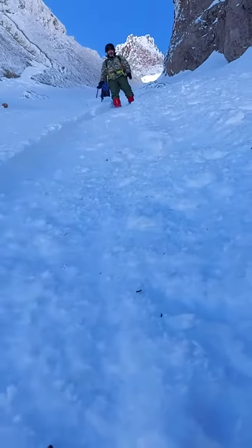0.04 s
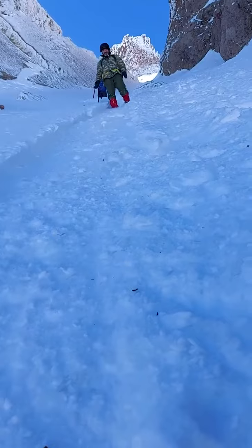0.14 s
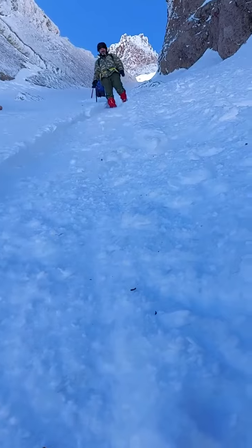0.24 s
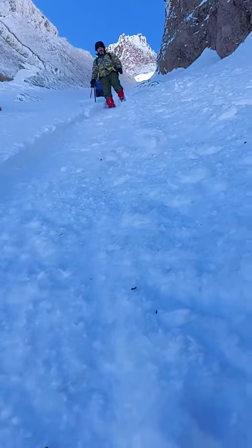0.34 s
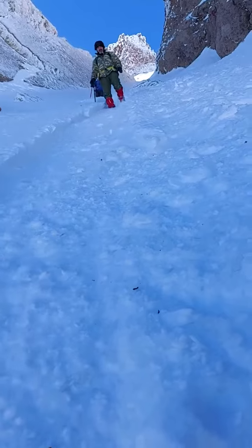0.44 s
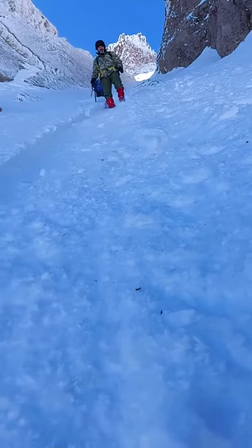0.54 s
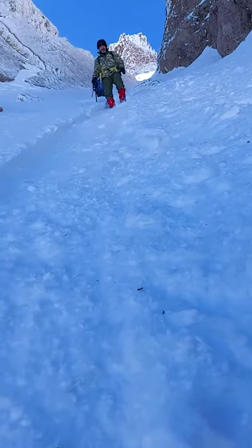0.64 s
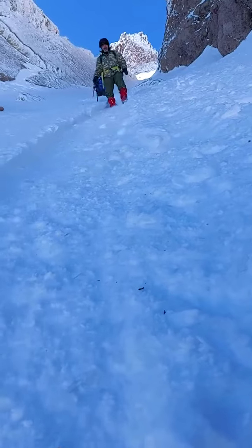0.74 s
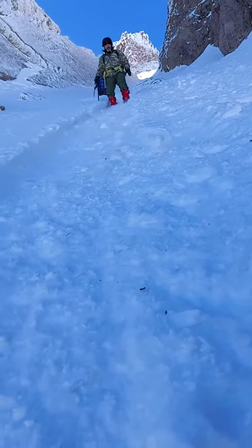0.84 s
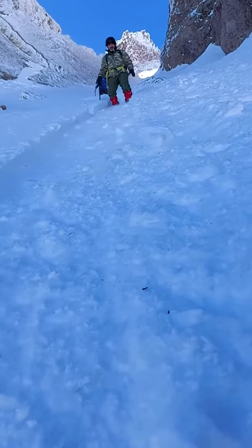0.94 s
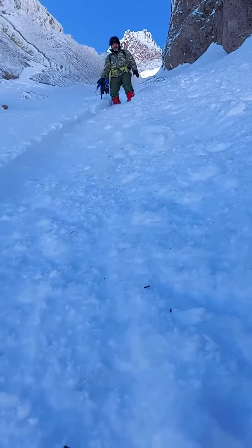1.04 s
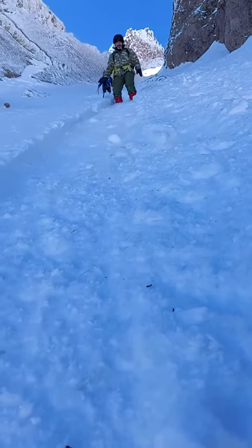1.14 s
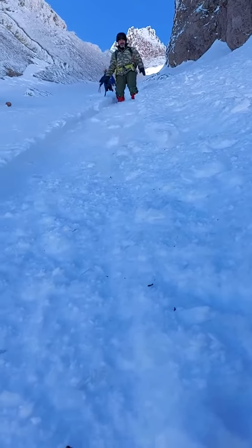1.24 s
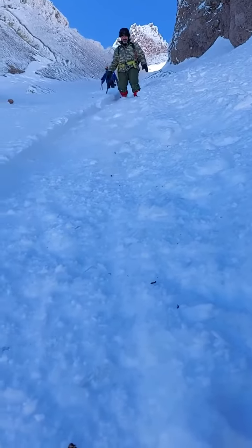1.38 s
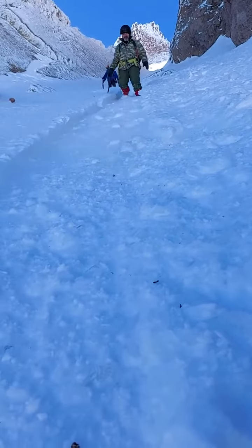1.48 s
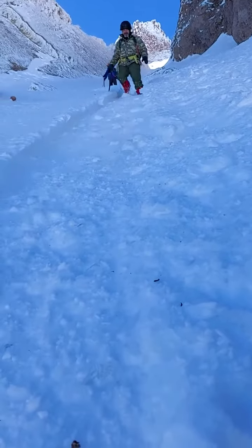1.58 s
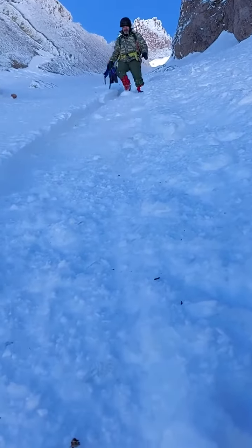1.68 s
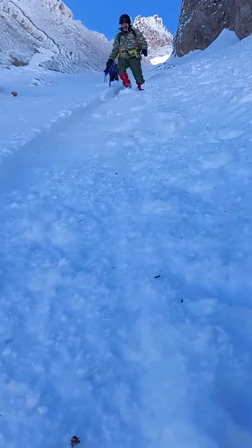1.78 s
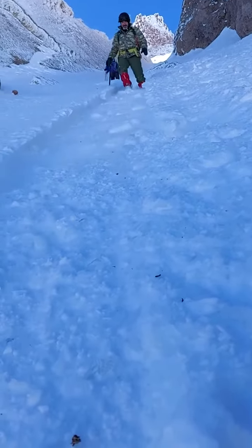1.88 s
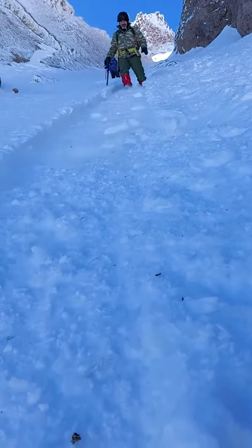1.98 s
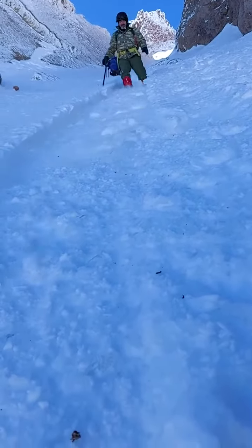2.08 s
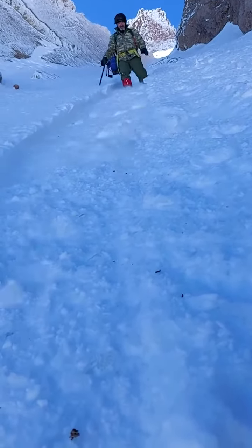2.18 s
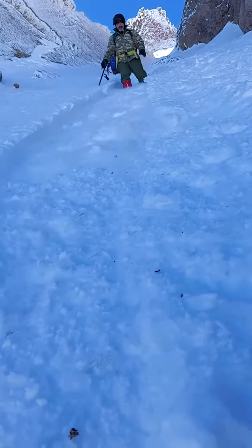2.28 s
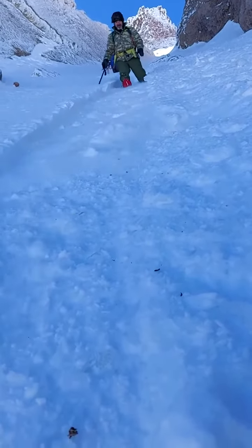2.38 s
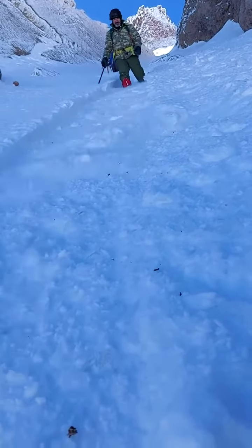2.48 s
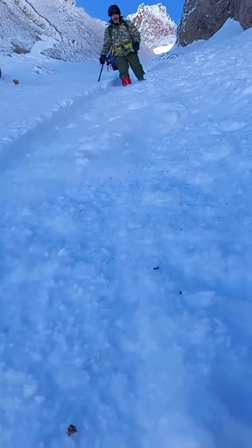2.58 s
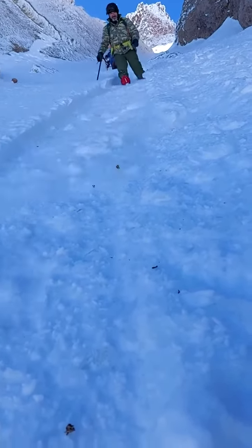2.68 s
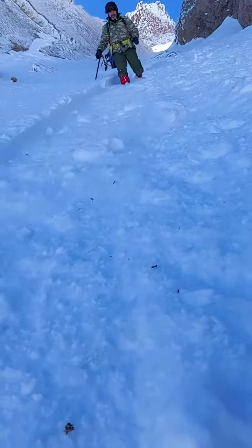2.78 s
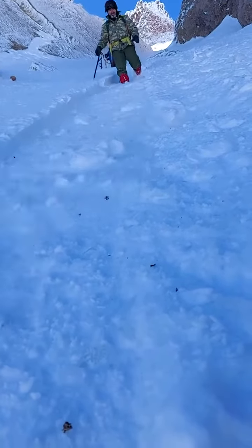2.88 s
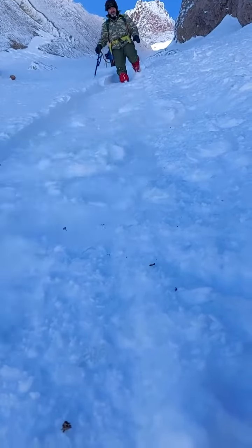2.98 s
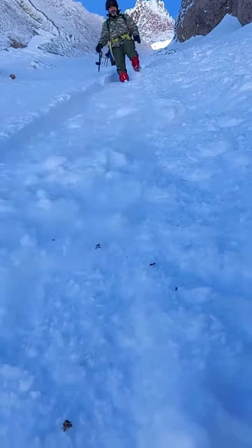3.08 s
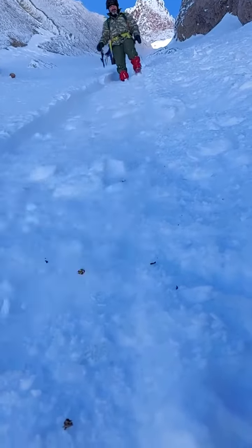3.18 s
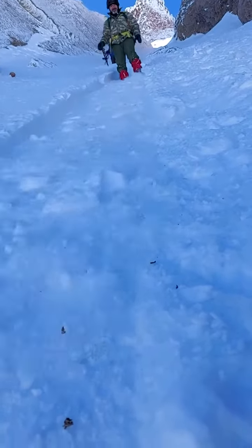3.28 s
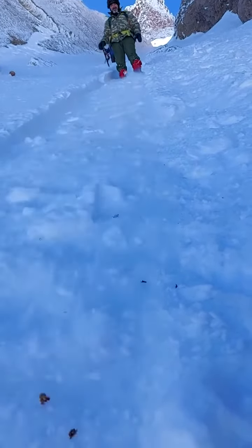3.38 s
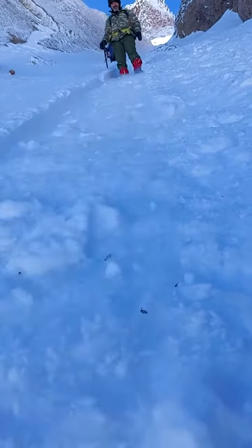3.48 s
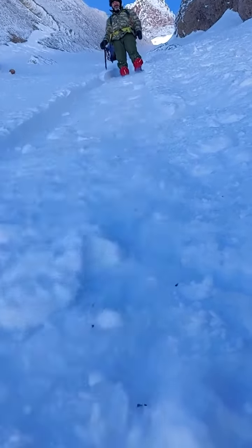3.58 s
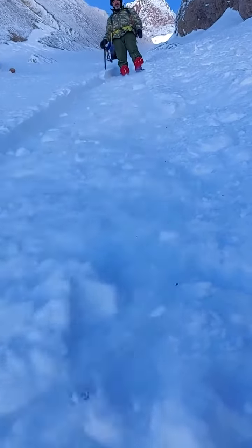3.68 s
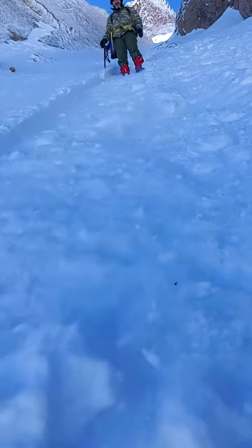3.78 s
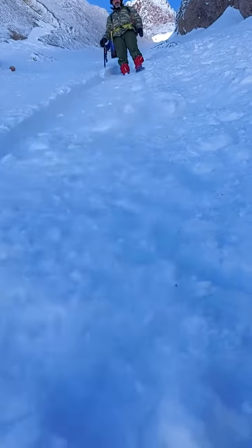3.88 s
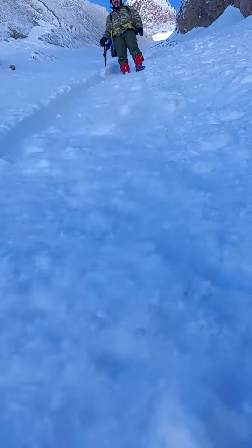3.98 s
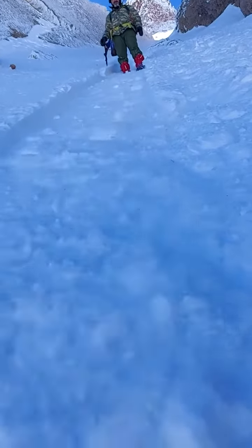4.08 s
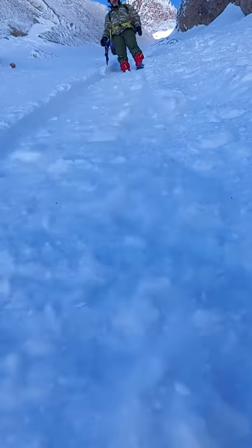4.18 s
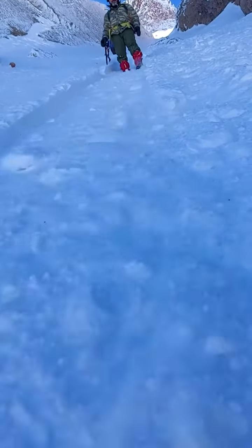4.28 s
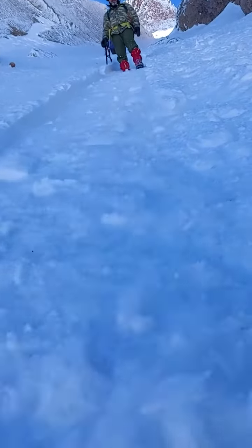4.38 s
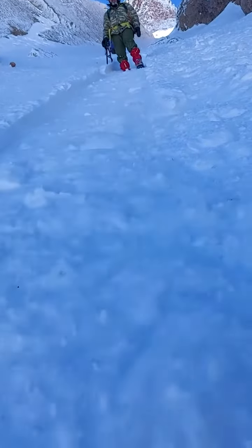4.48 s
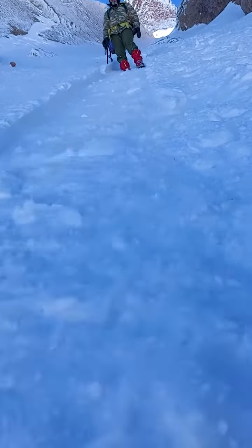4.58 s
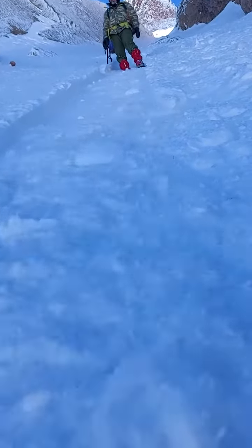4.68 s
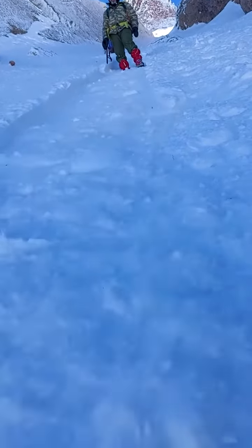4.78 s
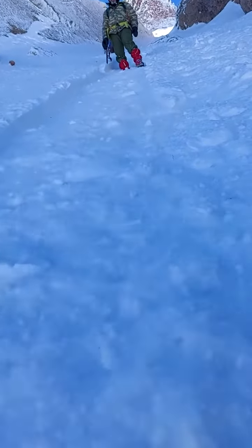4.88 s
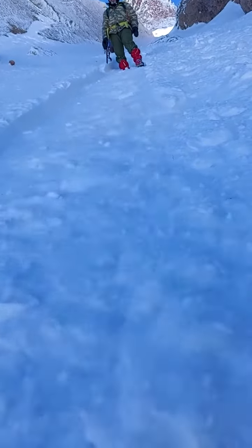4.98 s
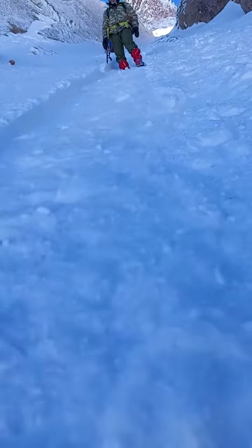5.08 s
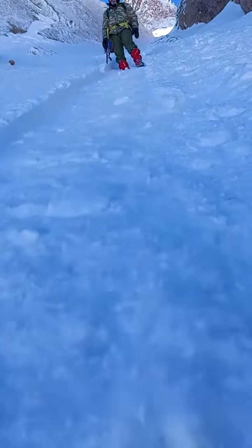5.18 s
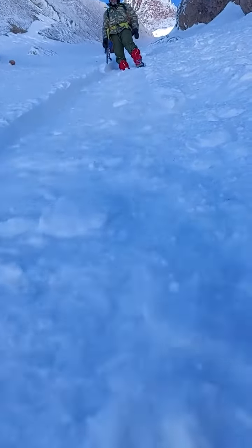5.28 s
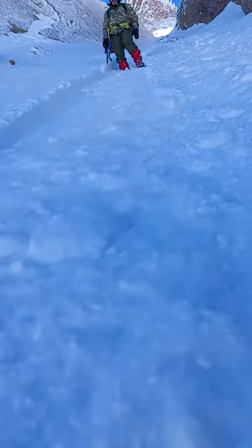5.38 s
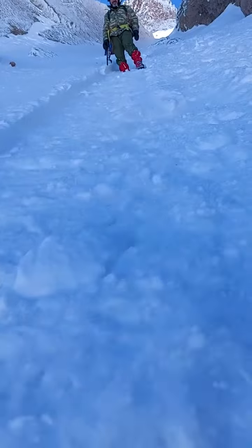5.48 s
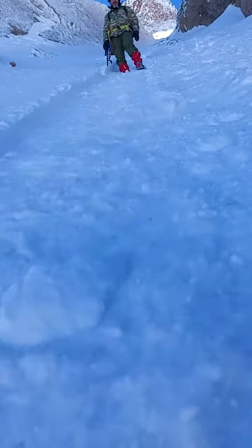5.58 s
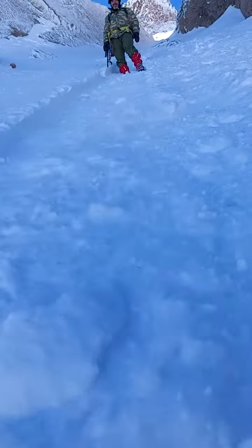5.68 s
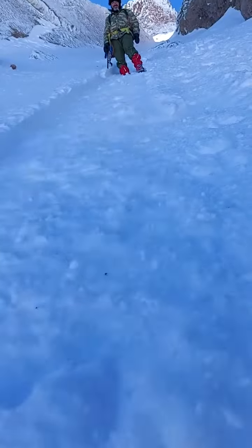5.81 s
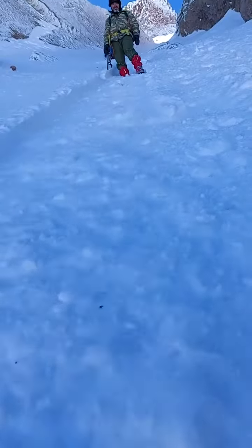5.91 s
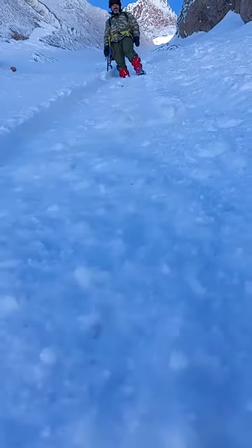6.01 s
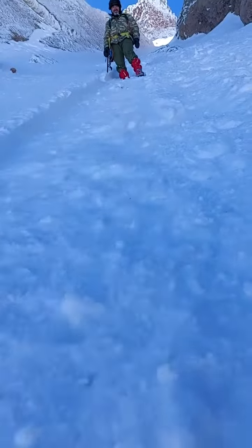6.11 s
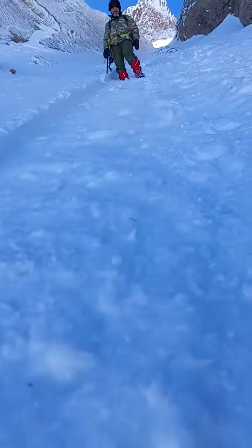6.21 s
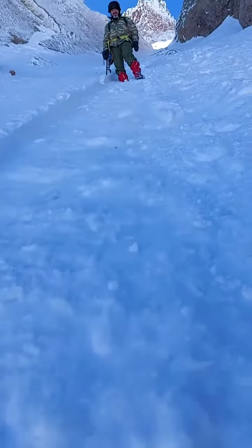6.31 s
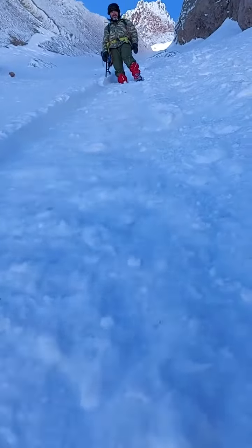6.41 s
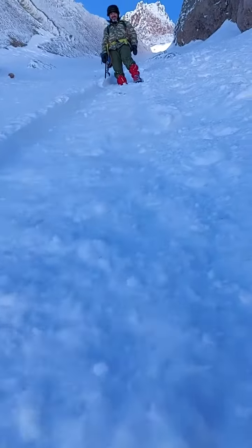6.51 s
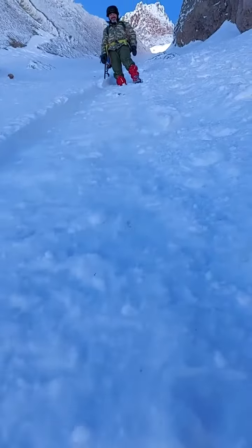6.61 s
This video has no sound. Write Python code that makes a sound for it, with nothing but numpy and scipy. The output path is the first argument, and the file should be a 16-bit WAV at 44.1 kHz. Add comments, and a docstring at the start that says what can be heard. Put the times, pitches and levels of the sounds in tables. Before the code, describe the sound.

Loose snow trickles down a steep mountain gully with a thin, high hiss on the right, while light wind buffets the microphone and something clinks faintly like metal gear. About three seconds in, the hiss swells into a broad, grainy slide over a duller rush of tumbling clods. It pours past on the right and eases slightly, with small hard clicks and soft lumps tapping close by.

```python
"""Loose snow slides down a steep gully past two spaced microphones.
First a thin trickle of crystals hisses on the right, with clinks like jingling metal gear, while light
wind buffets each microphone on its own. Then the front of the slide crosses from the left, and after
three seconds the trickle grows into a broad hiss over a duller rush of tumbling clods. To the end,
the mass pours by on the right, with small hard clicks, ringing clinks and soft lumps tapping near by."""
import sys
import numpy as np
from scipy import signal
from scipy.io import wavfile

SR = 44100
rng = np.random.default_rng(int(sys.argv[2]) if len(sys.argv) > 2 else 0)


def int16_out(signal):
    """Quantize to a 16-bit WAV file."""
    q = np.round(np.clip(np.atleast_2d(signal).T, -1, 1) * 32767)
    wavfile.write(sys.argv[1], SR, q.astype(np.int16))


N = 293265

# tone colour of rubbing crystals: f/Hz, level/dB
CRYSTAL_SPECTRUM = [(900, -15), (1600, -6.5), (2100, -5.5), (2750, -2), (3400, 0), (4200, -2), (5000, 4.5),
                    (5900, -2.5), (7000, -0.5), (8000, -4.5), (8750, -7), (9700, -3), (10500, -3.5),
                    (12500, -5), (15500, -5)]
CLUMP_DB, CLUMPS_PER_S = 3, 18  # larger impacts come in bunches
SIDE_LAG = 23  # samples by which a sound on the far right reaches the left microphone late
PAN = np.array([[.5], [-.5]])  # splits a left-minus-right level between the two sides


def crystal_hiss(level_db, treble_db, low_db, front):
    """Crystals rub and shatter all over the slope, so the two sides hear little in common."""
    # how alike the two sides sound: f/Hz, likeness (0 to 1)
    likeness = [(900, .7), (1800, .45), (3000, .25), (5000, .15), (8000, .25), (15000, .12)]
    trickle_db, full_db = -43.5, -41  # between these levels the trickle turns into the full slide
    fullness = np.clip((level_db - trickle_db) / (full_db - trickle_db), 0, 1)
    grains = impacts(per_s=450, spread_db=3, share=0.047)
    pair = flickering_bands(grains, CRYSTAL_SPECTRUM, likeness, shared_db=0.12, own_db=1.23,
                            own_rate=17.6, top_db=treble_db, bottom_db=low_db, front=front)
    sparkle = singing(fullness) + from_db(-10) * crystal_glints() + grain_ticks()
    pair = pair + delay_left(sparkle, SIDE_LAG * front[0])
    return from_db(level_db) * pair * from_db(-0.8 * PAN)


def singing(fullness, alike=0.15, waver_db=6.5):
    """Noise rings at a few pitches that swell and sink; the slide favours other ones than the trickle."""
    # pitches in the hiss: f/Hz, rough width/Hz, level in the trickle/dB, level in the full slide/dB
    pitches = [(1894, 240, -17.5, -20), (3300, 150, -15, -27.5), (3530, 460, -40, -13),
               (4470, 76, -15.5, -28), (4970, 210, -13.5, -14.5), (6210, 84, -15.5, -37),
               (6800, 230, -15, -14), (7200, 370, -9.5, -14)]
    out, white = 0, rng.standard_normal((2, 2, N))
    for k, (hz, width, thin_db, full_db) in enumerate(pitches):
        ring_s = 0.95 / width
        mid, side = ring(ring(white[k % 2], hz, ring_s), hz, ring_s)
        level_db = thin_db + (full_db - thin_db) * fullness + waver_db * np.tanh(drift(14))
        out = out + rms_one(stereo(mid, side, alike)) * from_db(level_db)
    return out


def crystal_glints(per_s=700, cycles=140):
    """Small crystals, scratched at random, ring briefly, each at its own pitch and place."""
    sizes = from_db(1.1 * np.minimum(rng.exponential(1, N), 4)) * bunched_hits(per_s, N)
    pitch_index = rng.integers(0, 36, N)
    pan = from_db(np.clip(rng.normal(0, 6.1, N), -12, 12) * PAN)
    out, grit = 0, rng.standard_normal(N)
    for k, hz in enumerate(np.geomspace(1200, 15000, 36)):
        fading_hits = signal.lfilter([1], [1, -.93], sizes * (pitch_index == k) * pan + 1e-18)
        scratch = fading_hits * np.roll(grit, 997 * k)
        out = out + ring(scratch, hz, cycles / hz) * from_db(at_hz(CRYSTAL_SPECTRUM, hz)) * hz ** 1.47
    return rms_one(out)


def grain_ticks(per_s=70, base_db=9, spread_db=1.5):
    """Single hard grains strike near by: needle-thin ticks that both microphones hear."""
    sizes = from_db(base_db + spread_db * np.minimum(rng.exponential(1, N), 4)) * rng.choice([-1, 1], N)
    pan = from_db(np.clip(rng.normal(0, 4, N), -10, 10) * PAN)
    hits = rng.random(N) < per_s / SR
    return filtered(sizes * pan * hits + 1e-18, 1, [1500, 11000], "band")


def clod_rush(level_db, front):
    """Clods tumble in the moving mass and make a dull rush."""
    # tone colour of the clods: f/Hz, level/dB
    spectrum = [(75, -25), (120, -16), (200, -16), (400, -10.5), (700, -9.5), (1200, -15), (2000, -26),
                (3500, -24.5)]
    # how alike the two sides sound: f/Hz, likeness (0 to 1)
    likeness = [(80, .85), (300, .9), (700, .8), (1200, .65), (2000, .4), (3500, .2)]
    clods = impacts(per_s=150, spread_db=1.5, share=0.18)
    pair = flickering_bands(clods, spectrum, likeness, shared_db=0.3, own_db=1.5, own_rate=12.3,
                            front=front)
    return from_db(level_db) * pair * from_db(-2.6 * PAN)


def level_dips():
    """The slide's level dips briefly and smoothly; the result is in dB."""
    # dips: t/s, length/s, depth/dB
    dips = [(0.566, 0.13, 3.5), (2.035, 0.071, 3.5), (3.071, 0.016, 8)]
    t = np.arange(N) / SR
    return sum(-db * np.cos(np.pi * np.clip((t - s) / length, -.5, .5)) ** 2 for s, length, db in dips)


def ringing_clicks(size=1500):
    """Small hard clicks: a crack of a millisecond or two, then a brief ring at one pitch."""
    # clicks: t/s, level/dB, f/Hz, cycles to fade by 60 dB
    clicks = [(0.017, -28.5, 4360, 32), (.629, -29, 4480, 50), (.642, -33, 4450, 70), (.668, -35, 4600, 60),
              (.800, -39, 6150, 80), (.817, -39, 6200, 70), (.819, -34, 2800, 5), (.839, -28, 6210, 60.0),
              (.842, -33, 6160, 60), (.850, -39, 6200, 80), (1.15, -40, 4400, 60), (1.236, -42, 4430, 60),
              (1.605, -33, 4300, 34), (2.063, -42, 4430, 40), (1.526, -27, 8200, 43),
              (1.664, -35, 3300, 24), (1.782, -31, 7260, 47), (2.17, -33, 8140, 35.0),
              (2.586, -33, 6600, 40), (2.5917, -22, 6300, 66), (2.5948, -18.5, 6470, 60),
              (2.617, -28, 6430, 60.0), (2.91, -24, 7260, 8), (2.911, -32, 2600, 4),
              (2.952, -26, 9300, 80.0), (3.054, -20, 6500, 15), (3.0565, -15.5, 7330, 35),
              (3.097, -35, 3560, 11), (3.0572, -30, 4900, 30.0), (3.291, -24, 4950, 17),
              (3.596, -29, 3600, 20), (3.623, -28, 3720, 30), (3.632, -22, 3600, 37),
              (3.725, -26, 12600, 40.0), (3.84, -15, 7300, 23), (3.928, -18, 8950, 1.5),
              (3.963, -16.5, 3370, 17), (3.995, -18.5, 3440, 12), (4.027, -17.5, 5300, 32),
              (4.128, -21, 3500, 3), (4.680, -23, 11500, 4), (4.694, -18.5, 11400, 9),
              (4.698, -21, 12000, 8), (4.700, -25, 11000, 8), (4.838, -24, 12500, 4), (4.876, -24, 3560, 4),
              (4.899, -19, 5000, 3.5), (5.018, -25, 7000, 40), (5.081, -29, 7000, 25),
              (5.213, -27, 5300, 30), (5.274, -25, 5070, 55.0), (5.326, -21.5, 7200, 35),
              (5.536, -24, 10600, 10), (5.581, -29, 6900, 30), (5.540, -25, 12500, 8),
              (5.598, -23, 11800, 10), (5.602, -27, 12800, 9), (5.865, -28, 7760, 25),
              (5.875, -24, 6900, 45.0), (5.889, -25, 7600, 30), (5.921, -25, 6900, 35),
              (5.961, -28, 8000, 15), (6.078, -27, 6900, 25), (6.392, -20.5, 6800, 60.0),
              (6.595, -32, 5600, 20.0), (6.629, -24, 6200, 39)]
    out, t = np.zeros((2, N + size)), np.arange(size) / SR
    for (s, db, hz, cycles), noise in zip(clicks, rng.standard_normal((len(clicks), 3, size))):
        burst = (noise[0] + 0.79 * noise[1:]) * np.exp(-t / 0.0014) * (1 - np.exp(-t / 0.0001))
        tone = peak_one(ring(burst, hz, max(cycles, 5) / hz))
        crack = peak_one(ring(burst, hz, 0.52 / hz))
        crack_db = -11 - 0.1678 * cycles  # the clearer the ring, the weaker the crack
        out[:, round(s * SR):][:, :size] += from_db(db) * (tone + from_db(crack_db) * crack)
    return filtered(out[:, :N], 2, 1800, "high") * from_db(-2.4 * PAN)


def clinks(bounces_per_s=250):
    """Quick uneven bounces keep one pitch ringing; the early clinks are like jingling metal gear."""
    # clinks: t/s, length/s, f/Hz, level/dB
    events = [(0.094, 0.11, 7270, -43.5), (0.47, 0.042, 7400, -45), (0.606, 0.075, 4530, -49),
              (0.792, 0.076, 6100, -47.5), (1.544, 0.05, 8650, -47.5), (2.412, 0.056, 6410, -46),
              (2.573, 0.054, 6260, -46), (2.607, .018, 7340, -40), (1.22, 0.065, 4400, -51),
              (3.103, 0.012, 3630, -38), (3.425, .025, 4900, -36), (3.525, 0.027, 4900, -36.5),
              (3.574, 0.046, 3630, -36), (3.619, 0.026, 3610, -31.5), (3.62, 0.024, 4400, -34),
              (3.777, .04, 7100, -35), (3.921, 0.042, 3450, -34), (4.855, 0.036, 1710, -40),
              (5.198, 0.043, 3120, -42), (5.323, 0.047, 7200, -42), (5.57, .03, 6830, -42),
              (5.68, .025, 7100, -42), (5.259, 0.034, 5020, -38), (5.328, .03, 3400, -40),
              (5.857, 0.07, 7800, -41), (5.862, 0.064, 6800, -43)]
    out = np.zeros((2, N))
    for s, length, hz, db in events:
        size = round(length * SR)
        bounces = rng.standard_normal((2, 9000)) * (0.47 + (rng.random(9000) < bounces_per_s / SR))
        tone = rms_one(ring(bounces[:, :size], hz, ring_s=0.016))
        out[:, round(s * SR):][:, :size] += from_db(db) * np.hanning(size) ** .5 * tone
    return out


def lump_taps(size=800):
    """A soft lump of snow gives a sharp knock and hardly more than one cycle of a thud."""
    # tapping lumps: t/s, level/dB, f/Hz, left minus right/dB, place (-1 left to 1 right)
    taps = [(1.849, -39.5, 800, -8, 0.36), (1.886, -46, 880, -10, 0.62), (2.77, -34, 620, -4, -0.43),
            (3.030, -25.5, 1040, -5.5, 1), (3.0566, -17, 1630, -1, 0.93), (3.29, -23.5, 1430, 1, -0.23),
            (3.31, -29.5, 450, -5, -0.11), (3.510, -27, 586, -2, 0.095), (3.633, -31, 663, -3, 0.67),
            (3.891, -30, 680, -1, 0.98), (4.376, -21.5, 535, -3, 0.57), (4.868, -23, 1540, -4, 1),
            (5.226, -33, 550, -1, 0.95), (5.293, -28, 450, -2, 0.57), (6.15, -32, 610, -2, 0.53),
            (6.35, -32, 406, -2, 0.37), (6.522, -28.5, 580, -2, 0.67)]
    out, t = np.zeros((2, N + size)), np.arange(size) / SR
    for s, db, hz, pan_db, place in taps:
        phase = hz * t - .75  # cycles from the middle of the tap
        thud = np.sin(2 * np.pi * phase) * np.exp(-(phase / 0.35) ** 2)
        knock = 0.27 * np.sin(4 * np.pi * phase) * np.exp(-(phase / 0.54) ** 2)
        pair = peak_one(thud + knock) * from_db(db + pan_db * PAN)
        out[:, round((s - .75 / hz) * SR):][:, :size] -= delay_left(pair, SIDE_LAG * place)
    return out[:, :N]


def wind(flutter_db=4.5, flutter_per_s=25.5, rise_db_per_s=600, fall_db_per_s=558):
    """Swirling air rumbles at each microphone on its own; each gust rises, holds and dies."""
    # steady buffeting: t/s, left level/dB, right level/dB
    breeze = [(0, -44, -64), (.35, -63, -83), (1.0, -54, -62), (1.75, -56.5, -80), (2.25, -46.5, -54),
              (2.75, -71, -49), (3.0, -65, -79), (3.3, -58, -70), (3.6, -76, -58.5), (4.65, -67, -60.5),
              (5.2, -66, -52), (6.65, -74, -58)]
    # gusts: t/s, hold/s, level/dB, left minus right/dB
    gusts = [(0.047, 0.03, -44, -1), (0.177, 0.012, -36, 0), (0.285, 0.053, -60, -18),
             (0.438, 0.0085, -46, 11), (0.517, .01, -51.5, 0), (0.625, 0.026, -46.5, 6),
             (0.693, 0.0071, -43.5, -3), (0.888, 0.019, -50, -6), (0.944, 0.017, -40.5, -5),
             (1.04, 0.0094, -56, -5), (1.124, 0.044, -62, -6), (1.255, 0.024, -58, -5),
             (1.34, 0.0081, -42, -7), (1.397, 0.015, -36, -3), (1.464, 0.066, -33.5, 0.5),
             (1.637, 0.023, -42, -1), (1.833, 0.018, -60, 12), (1.954, 0.046, -62, 28),
             (2.082, 0.0091, -49, 5), (2.2, 0.039, -43, -4), (2.385, 0.022, -49, 6), (2.555, 0.03, -48, 9),
             (2.574, 0.025, -38, 1), (2.788, 0.027, -49.5, -10), (2.863, 0.08, -48, -1),
             (3.105, 0.02, -52, 21), (3.578, 0.057, -50, -7), (3.9, .02, -53, -10), (4.085, .03, -54, -9),
             (6.061, .03, -54, -8), (6.215, .03, -56, -8), (6.34, 0.042, -45, -5), (6.565, 0.036, -53, -7)]
    # tone colour of the wind: f/Hz, level/dB
    spectrum = [(25, -12), (45, 4), (80, 5.5), (110, -2.5), (150, -15), (300, -18.5), (600, -38),
                (1000, -66)]
    # how alike the two sides sound: f/Hz, likeness (0 to 1)
    likeness = [(25, 0.13), (1000, 0.18)]
    t = np.arange(N) / SR
    flutter = np.array([drift(flutter_per_s), drift(flutter_per_s)])
    power = from_db(np.array(in_time(breeze)) + flutter_db * flutter) ** 2
    for s, hold, db, pan_db in gusts:
        before, after = np.maximum(s - hold / 2 - t, 0), np.maximum(t - s - hold / 2, 0)
        loss_db = rise_db_per_s * before + fall_db_per_s * after
        near = loss_db < 50
        power[:, near] += from_db(db - loss_db[near] + pan_db * PAN) ** 2
    white = rng.standard_normal((2, 2, N))
    pair = flickering_bands(white, spectrum, likeness, shared_db=0.5, own_db=-0.5, own_rate=22)
    return pair * np.sqrt(power)


def impacts(per_s, spread_db, share):
    """Countless tiny impacts blur to noise; a share of the power is in larger single ones."""
    shape = (2, N)
    sizes = from_db(spread_db * np.minimum(rng.exponential(1, shape), 5)) * rng.choice([-1, 1], shape)
    blur = rng.standard_normal((2, 2, N))
    large = rms_one(sizes * bunched_hits(per_s, shape))
    return np.sqrt(1 - share) * blur + np.sqrt(share) * large


def bunched_hits(per_s, shape):
    """True wherever an impact lands; the chance drifts, so they come in bunches."""
    return rng.random(shape) < per_s * from_db(CLUMP_DB * drift(CLUMPS_PER_S)) / SR


def flickering_bands(source, spectrum, likeness, shared_db, own_db, own_rate,
                     top_db=0, bottom_db=0, front=(1, 0)):
    """Shapes noise in third-octave stereo bands that flicker all together and with their neighbours."""
    # how late the left microphone hears snow on the far right: f/Hz, delay/samples
    lags = [(60, 6), (190, 6), (380, 13), (760, 15), (1500, 20), (3000, 24), (16000, 24)]
    place, compact = front
    count = round(3 * np.log2(spectrum[-1][0] / spectrum[0][0]))
    edges = np.geomspace(spectrum[0][0], spectrum[-1][0] * 1.1, count + 1)
    out, power = 0, 0
    together, below = drift(8.3) + drift(57.4), drift(own_rate)
    for k, (low, high) in enumerate(zip(edges, edges[1:])):
        mid, side = filtered(source[k % 2], 2, [low, high], "band")
        hz, own = np.sqrt(low * high), drift(own_rate)
        alike = np.clip(at_hz(likeness, hz) * (1 - compact) + compact, -1, 1)
        band = from_db(at_hz(spectrum, hz)) * stereo(mid, side, alike)
        treble_db = top_db * np.clip(2 * np.log2(hz / 6500), 0, 1)
        low_db = bottom_db * np.clip(np.log2(3600 / hz), 0, 1)
        calming = min(6500 / hz, 1)  # the highest bands flicker less
        flicker_db = shared_db * together + own_db * calming * (own + below)
        out = out + delay_left(band, at_hz(lags, hz) * place) * from_db(flicker_db + treble_db + low_db)
        power, below = power + np.mean(band ** 2), own
    return out / np.sqrt(power)


def ring(x, hz, ring_s):
    """Each click in x starts a tone that fades by 60 dB in ring_s seconds."""
    decay, step = from_db(-60 / (ring_s * SR)), 2 * np.pi * hz / SR
    return signal.lfilter([np.sin(step)], [1, -2 * decay * np.cos(step), decay * decay], x)


def drift(rate):
    """A smooth random wobble of size about 1; a higher rate makes it quicker."""
    decay = np.exp(-80 * np.pi * rate / SR)
    noise = rng.standard_normal(N // 40 + 2002)  # one value every 40 samples
    slow = signal.lfilter([1], [1, -2 * decay, decay * decay], noise)[2000:]
    return np.interp(np.arange(N) / 40, np.arange(len(slow)), rms_one(slow))


def stereo(mid, side, alike):
    """Left and right from a common part and an opposite part."""
    return np.sqrt(1 + alike) * mid + np.sqrt(1 - alike) * side * [[1], [-1]]


def delay_left(pair, lag):
    """The left side hears the sound lag samples later (earlier if negative)."""
    size = pair.shape[1]
    index = np.clip(np.arange(size) - np.round(lag).astype(int), 0, size - 1)
    return np.array([pair[0][index], pair[1]])


def filtered(x, order, hz, kind):
    """Keeps the highs or one band; a higher order cuts more steeply."""
    return signal.sosfilt(signal.butter(order, hz, kind, fs=SR, output="sos"), x)


def in_time(rows):
    """Turns a timed table into curves with one value a sample."""
    s, *columns = np.transpose(rows)
    return [np.interp(np.arange(N) / SR, s, column) for column in columns]


def at_hz(points, hz):
    """Reads a table at a frequency, with octaves evenly spaced."""
    freqs, values = np.transpose(points)
    return np.interp(np.log(hz), np.log(freqs), values)


def from_db(db):
    """Turns decibels into a gain."""
    return 10 ** (np.asarray(db) / 20)


def rms_one(x):
    """Scales to an average power of 1."""
    return x / np.sqrt(np.mean(x ** 2) + 1e-20)


def peak_one(x):
    """Scales to a peak of 1."""
    return x / np.abs(x).max()


def scene():
    """The slide, the clicks and clinks, the lumps and the wind, left and right."""
    # strength of the slide: t/s, hiss/dB, extra treble/dB, extra low hiss/dB, rush of clods/dB
    slide_levels = [(0.0, -45, 5.5, 0.5, -60), (0.5, -46.5, 6.5, 0.5, -63.5), (0.8, -47.5, 4.5, 7, -67.5),
                    (1.1, -51, 6.5, 6.5, -64.5), (1.75, -47, 2, -10, -66), (2.3, -49.5, 5.5, -2.5, -60),
                    (2.6, -47.5, 5.5, -7, -61.5), (3.0, -41.5, 4, 0, -58), (3.085, -41, 6, 1, -53.5),
                    (3.105, -39, 4, 3, -53.5), (3.2, -39, 2.5, -3, -54), (3.35, -35.5, 4.5, 0.5, -48.5),
                    (3.5, -36.5, 6, -4, -48.5), (3.62, -32, 2.5, -9, -46), (3.68, -32.5, 3.5, -8, -47.5),
                    (3.82, -32, 6, 4.5, -46), (4.02, -29, 2, 6, -45), (4.1, -33, 4, 6.5, -45),
                    (4.6, -35, 1, 4.5, -43.5), (5.1, -37.5, 2.5, 7.5, -44.5), (5.9, -37, 3, 6, -45),
                    (6.2, -37, 1.5, 4, -44), (6.65, -37.5, 1.5, 8, -46)]
    # path of the snow: t/s, place (-1 left to 1 right), share from one compact front (0 to 1)
    path = [(0, 0.92, 0.04), (1.15, 0.98, 0.24), (1.45, -0.27, 0.4), (2.0, -0.5, 0), (2.4, -0.3, 0.5),
            (2.8, -0.19, 0.2), (3.3, 0, 0), (3.6, 0.2, 0), (3.82, 0.97, 0.02), (6.65, 0.97, 0)]
    hiss_db, treble_db, low_db, rush_db = in_time(slide_levels)
    front = in_time(path)
    slide = crystal_hiss(hiss_db, treble_db, low_db, front) + clod_rush(rush_db, front)
    clinking = delay_left(ringing_clicks() + clinks(), SIDE_LAG * front[0])
    return slide * from_db(level_dips()) + clinking + lump_taps() + wind()


def record(dry, cutoff_hz=16000):
    """The deepest bass is softened and the highest treble is cut."""
    dry = filtered(dry, 3, 32, "high")
    return signal.sosfilt(signal.cheby2(22, 80, cutoff_hz, fs=SR, output="sos"), dry)


dry = scene()
out = record(dry)
int16_out(out)
```